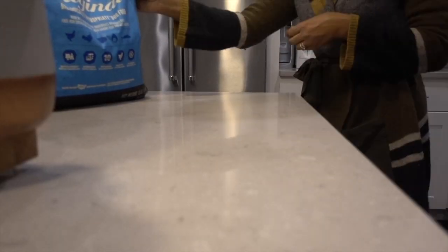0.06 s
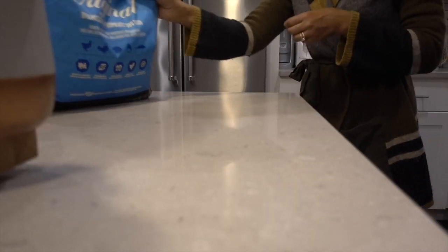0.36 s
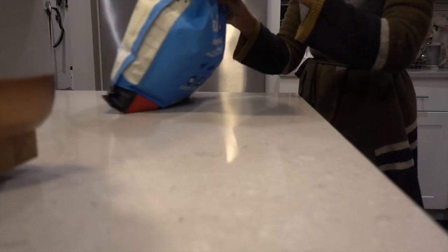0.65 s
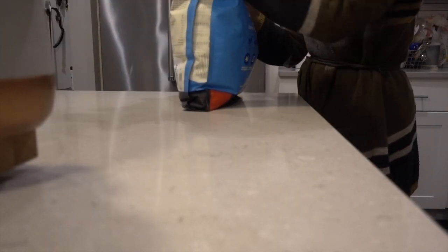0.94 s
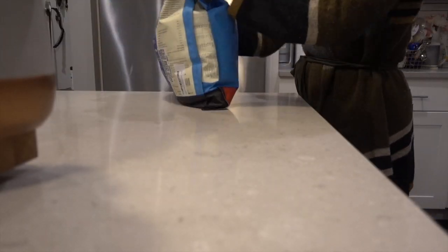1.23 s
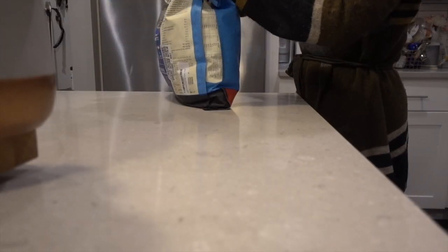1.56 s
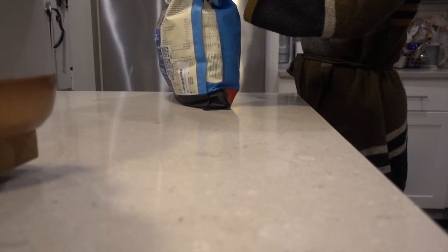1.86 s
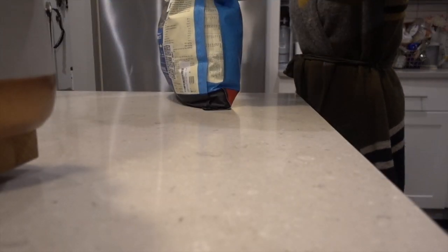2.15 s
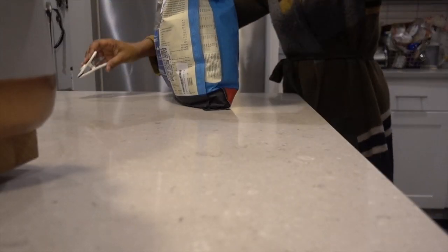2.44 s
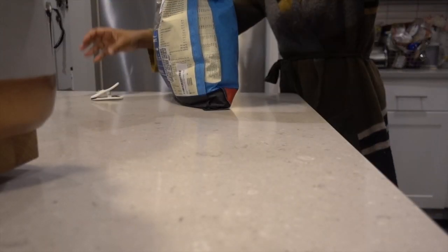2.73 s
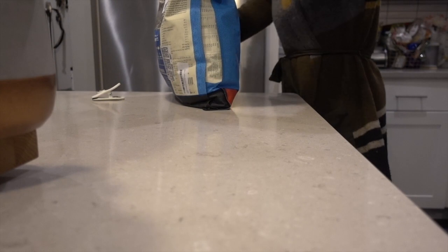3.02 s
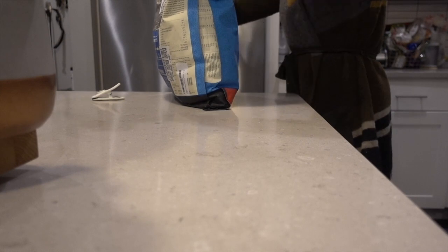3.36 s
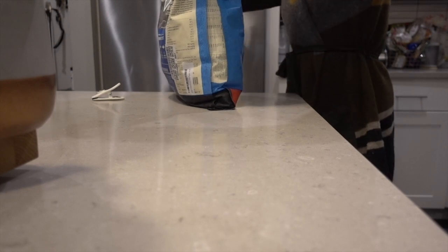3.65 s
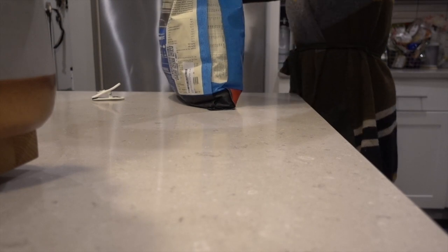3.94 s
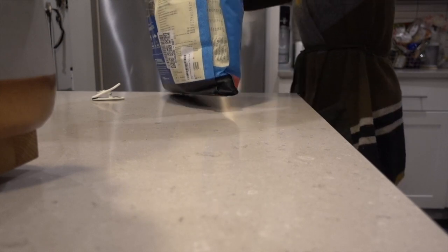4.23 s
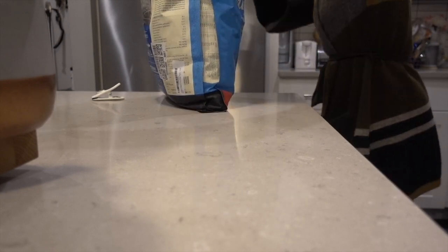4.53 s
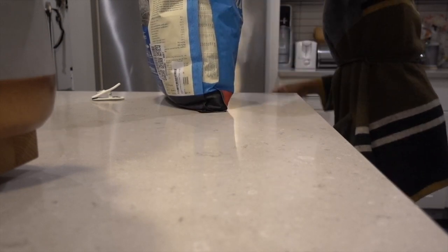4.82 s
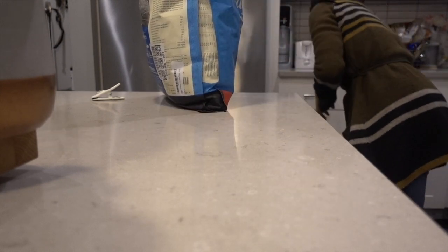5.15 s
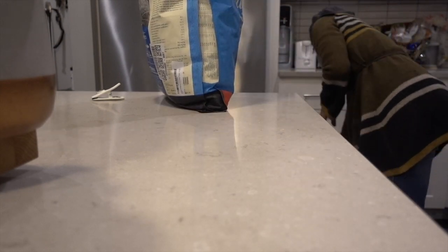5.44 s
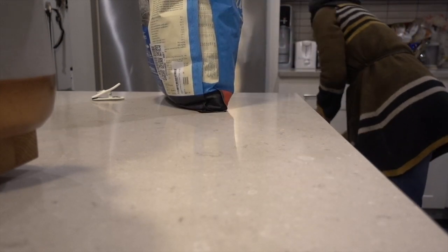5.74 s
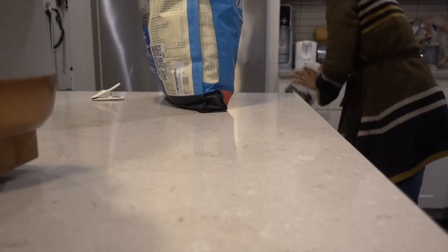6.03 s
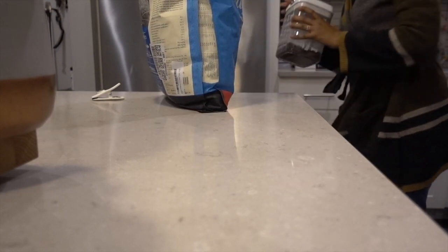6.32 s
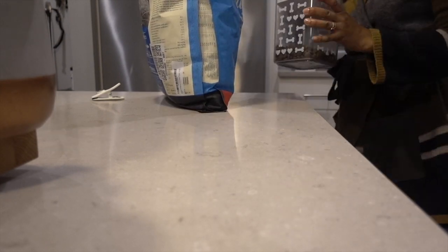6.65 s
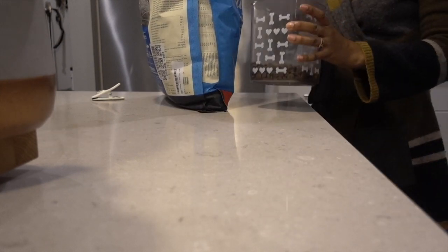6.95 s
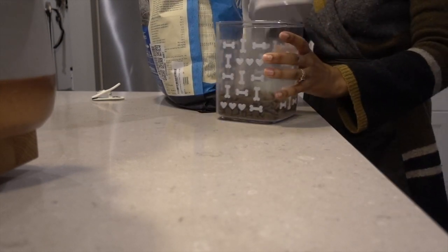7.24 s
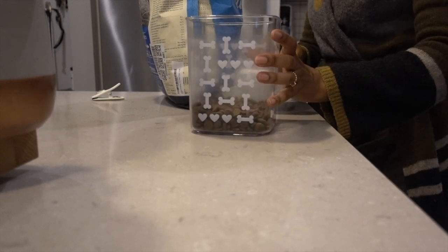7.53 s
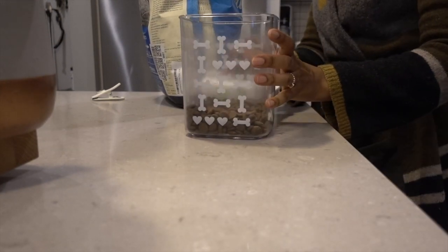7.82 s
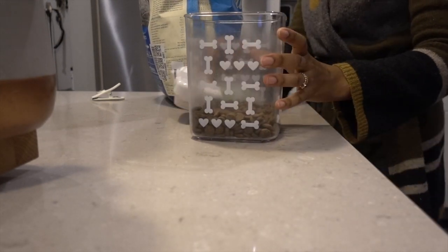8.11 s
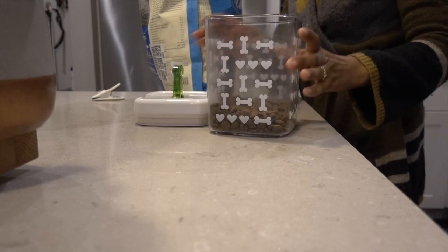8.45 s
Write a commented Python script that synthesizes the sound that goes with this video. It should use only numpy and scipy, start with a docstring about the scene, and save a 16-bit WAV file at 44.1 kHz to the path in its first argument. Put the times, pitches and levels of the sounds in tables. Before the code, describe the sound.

Stiff bag crackling with shifting dry pet food, a small clip dropping, a cupboard knock, then a plastic canister and lid set on stone.

```python
"""Dog food bag and canister

A big plastic bag of dry dog food is dragged over a stone kitchen counter and pulled open: its skin
hisses, creases snap, kibble slumps, and its clip drops and bounces. The bag is hitched up and set down.
A cupboard knocks, and a plastic canister is fetched with some kibble rattling in it. It bumps down on
the counter with a hollow ring, and its lid is laid beside it with a snap and a short rasp."""
import sys
import numpy as np
from scipy import signal
from scipy.fft import rfft, irfft, next_fast_len
from scipy.io import wavfile

SR = 44100
rng = np.random.default_rng(int(sys.argv[2]) if len(sys.argv) > 2 else 0)


def unload_wav(signal):
    """Save mono or channel-first audio to the path in sys.argv[1] as 16-bit WAV at rate SR, clipped to [-1, 1]."""
    wavfile.write(
        sys.argv[1],
        SR,
        np.round(np.clip(np.atleast_2d(signal).T, -1, 1) * 32767).astype(np.int16),
    )


N = 378378
TIME = np.arange(N) / SR


def from_db(db):
    """Decibels to gain."""
    return 10 ** (np.asarray(db) / 20)


def rms_one(x):
    """Scale to unit power."""
    return x / np.sqrt(np.mean(x ** 2) + 1e-20)


def at_hz(points, hz):
    """Read a table on a log-frequency axis."""
    f, value = np.transpose(points)
    return np.interp(np.log(np.maximum(hz, 1)), np.log(f), value)


def add(track, s, sound):
    """Mix a short sound into a track at time s."""
    start = int(np.clip(round(s * SR), 0, N - 1))
    track[start:start + len(sound)] += sound[:N - start]


def colour(x, spectrum, size=4096):
    """Minimum-phase EQ with the given curve; white input keeps its power."""
    cepstrum = irfft(np.log(from_db(at_hz(spectrum, np.fft.rfftfreq(size, 1 / SR)))))
    cepstrum[1:size // 2] *= 2
    cepstrum[size // 2 + 1:] = 0
    response = irfft(np.exp(rfft(cepstrum)))
    return signal.oaconvolve(x, response / np.linalg.norm(response))[:N]


def low_cut(x, hz):
    """A small light panel radiates no bass."""
    return signal.sosfilt(signal.butter(3, hz, "high", fs=SR, output="sos"), x + 1e-18)


def fade(t, t60):
    """Amplitude of a free decay."""
    return np.exp(-np.log(1000) * t / t60)


def ring(hz, t60):
    """A struck mode: a decaying sine."""
    t = TIME[:int(1.5 * t60 * SR) + 2]
    return np.sin(2 * np.pi * hz * t) * fade(t, t60)


def contacts(rows, t60):
    """Each contact is a fast-dying crack of noise."""
    out, t = np.zeros(N), TIME[:SR // 10]
    shape = fade(t, t60)
    for (s, db), noise in zip(rows, rng.standard_normal((len(rows), len(t)))):
        add(out, s, from_db(db) * rms_one(noise * shape) * np.sqrt(np.mean(shape ** 2)))
    return out


def grains(per_s, spread_db):
    """Random tiny impacts at unit power; spread_db sets how uneven they are."""
    sizes = from_db(spread_db * np.minimum(rng.exponential(1, N), 4)) * rng.choice([-1, 1], N)
    return rms_one(sizes * (rng.random(N) < per_s / SR))


def strokes(rows, attack_s, release_t60):
    """Envelope of movements that build up, hold and die away."""
    power = np.zeros(N)
    for s, db, length in rows:
        t = TIME[:int((length + release_t60) * SR)]
        release = fade(np.maximum(t - length, 0), release_t60)
        add(power, s, (from_db(db) * np.minimum(t / attack_s, 1) * release) ** 2)
    return np.sqrt(power)


def swells(rows):
    """Envelope of slides that speed up and slow down; friction grows about as the root of speed."""
    power = np.zeros(N)
    for s, db, length in rows:
        speed = np.abs(np.sin(np.pi * TIME[:int(length * SR)] / length))
        add(power, s, (from_db(db) * speed ** 0.52) ** 2)
    return np.sqrt(power)


def surges(rows, rise_s):
    """Envelope of avalanches that start at once, hold, then run out."""
    power, t = np.zeros(N), TIME[:SR // 2]
    for s, db, length in rows:
        add(power, s, (from_db(db) * (1 - np.exp(-t / rise_s)) * np.exp(-(t / length) ** 2)) ** 2)
    return np.sqrt(power)


def jerks(depth_db, per_s):
    """A gain that wanders at random: stiff plastic yields in fits and starts."""
    draws = rng.standard_normal(2000)
    return from_db(depth_db * np.interp(TIME * per_s, np.arange(len(draws)), draws))


# stereo width of the room: f/Hz, side minus mid/dB
ROOM_WIDTH = [(120, -44), (250, -29), (500, -19.5), (1000, -10.5), (2000, -9.5), (4200, 1.5), (8000, 0),
              (14000, -1.5)]
def diffuse(mid, side):
    """Sound from all around: near mono in the bass, wide in the treble."""
    size = next_fast_len(len(side))
    width = from_db(at_hz(ROOM_WIDTH, np.fft.rfftfreq(size, 1 / SR)))
    side = irfft(rfft(side, size) * width, size)[:len(mid)]
    return np.array([mid + side, mid - side])


# midrange rush of the kitchen: f/Hz, level/dB
ROOM_TONE_EQ = [(29, -102), (50, -59), (167, -28), (246, -11.5), (418, -13), (520, -1.5), (661, -3),
                (802, -2), (863, -7), (950, -5.5), (1540, -11), (1820, -14.5), (2380, -11), (3670, -22.5),
                (16000, -37)]
def room_tone():
    """A soft, steady bed of noise; its level dips once, briefly."""
    mid, side = [colour(noise, ROOM_TONE_EQ) for noise in rng.standard_normal((2, N))]
    dip = np.exp(-((TIME - 1.2) / 0.7) ** 2)
    return from_db(-44 - 13 * dip) * diffuse(mid, side)


# hands squeezing, hands and sleeves rubbing, kibble slumping: t/s, level/dB, length/s
BAG_SQUEEZES = [(0.02, -36, 0.13), (0.18, -26, 0.2), (0.45, -34, 0.88), (1.14, -23.5, 0.1),
                (1.34, -39, 0.078), (1.79, -37, 0.29), (2.07, -31, 0.23), (2.39, -30.5, 0.078),
                (2.63, -40, .06), (2.97, -35.5, 0.076), (3.29, -29, 0.15), (3.43, -22, 0.093),
                (3.8, -36, .3), (4.2, -22.5, 0.13)]
BAG_RUBS = [(0.0, -39, 0.13), (1.07, -38.5, .4), (1.61, -44.5, .15), (1.76, -45, 0.3), (2.27, -39.5, .2),
            (2.62, -41, 0.28), (3.06, -40, .07), (3.26, -35.5, 0.14), (3.49, -38, 0.11), (3.77, -46, 0.1),
            (3.99, -43, .16), (4.17, -37.5, 0.12), (4.36, -41, 0.14), (4.59, -46, .13)]
KIBBLE_SLUMPS = [(.19, -27, 0.087), (1.163, -22, 0.11), (1.35, -28, 0.098), (2.143, -22.5, 0.025),
                 (2.185, -20, 0.07), (2.312, -31, 0.04), (3.325, -32.5, 0.11), (3.432, -26.5, 0.048),
                 (3.966, -20, 0.051), (4.005, -18, 0.12), (4.246, -16, 0.04), (4.372, -19, 0.011),
                 (4.379, -19, 0.027), (4.43, -23, 0.026)]
# fader curve of the drag, gathering speed and slowing: t/s, level/dB
BAG_DRAG = [(0.2, -51), (0.45, -27), (0.89, -30.5), (1.06, -43.5)]
# the bag's bottom bumping the counter: t/s, level/dB
BAG_BUMPS = [(.244, -13.5), (.3, -14.5), (.582, -18), (.698, -16), (.741, -16.5), (.8, -29), (.988, -25),
             (4.251, -11), (4.383, -11.5)]
# the bag's body, sliding hiss, bright plastic tick and dull bump: f/Hz, level/dB
BAG_EQ = [(29, -87), (50, -66), (91, -31), (122, -16), (252, -3), (371, -1), (783, 1), (973, 0.5),
          (1300, 4), (1500, 2), (2560, 1.5), (3180, -2.5), (5270, -10.5), (10100, -40.5), (16000, -29)]
SLIDE_EQ = [(40, -55), (150, -28), (330, 0), (650, -6.5), (1200, -2.5), (3000, 0.5), (4800, -8.5),
            (7000, -0.5), (10000, 1.5), (13500, -6), (16000, -8)]
TICK_EQ = [(3000, -19.5), (5000, -1.5), (7500, 2), (10500, 0.5), (13000, -6), (16000, -16)]
BUMP_EQ = [(40, -48), (110, -30), (250, -4), (400, 0), (700, 7.5), (1300, -3), (3000, -8.5), (8000, -64)]
def bag_rustle():
    """Small folds crackle, kibble slumps against the walls, the skin hisses and the bottom bumps."""
    crumple = strokes(BAG_SQUEEZES, attack_s=0.0082, release_t60=0.18) * jerks(depth_db=2, per_s=28)
    fine_folds = from_db(-8) * grains(per_s=1200, spread_db=4)
    single_folds = from_db(-11) * grains(per_s=65, spread_db=4)
    crackle = crumple * (fine_folds + single_folds)
    load = surges(KIBBLE_SLUMPS, rise_s=0.0025)
    slump = from_db(-2.5) * load * grains(per_s=1300, spread_db=3.5)
    crinkle = from_db(-17) * load * grains(per_s=200, spread_db=1.5)   # the load flicks tiny sharp folds
    drag_s, drag_db = np.transpose(BAG_DRAG)
    gate = (TIME > drag_s[0] - 0.05) & (TIME < drag_s[-1] + 0.05)
    drag = from_db(np.interp(TIME, drag_s, drag_db)) * gate
    hiss = np.hypot(drag, swells(BAG_RUBS)) * grains(per_s=11000, spread_db=4.5)
    bumps = colour(contacts(BAG_BUMPS, t60=0.027), BUMP_EQ)
    return colour(crackle + slump, BAG_EQ) + colour(crinkle, TICK_EQ) + colour(hiss, SLIDE_EQ) + bumps


# broad crack of a plastic panel: f/Hz, level/dB
CRACK_EQ = [(60, -62), (150, -19.5), (300, -5.5), (700, 1), (1200, -1), (3000, 4.5), (4200, -2.5),
            (5500, -26.5), (16000, -37)]
def snaps(rows, ring_db, body_db, tick_db, ring_t60):
    """A plastic panel snaps: a brief ring at its own pitch, a broad crack and a bright tick."""
    panel = np.zeros(N)
    for s, db, hz, bright in rows:
        add(panel, s, from_db(db) * ring(hz, ring_t60))
    body = colour(contacts([(s, db) for s, db, hz, bright in rows], t60=0.022), CRACK_EQ)
    tick = colour(contacts([(s, bright) for s, db, hz, bright in rows], t60=0.012), TICK_EQ)
    return from_db(ring_db) * low_cut(panel, hz=444) + from_db(body_db) * body + from_db(tick_db) * tick


# the loudest creases: t/s, level/dB, f/Hz, tick level/dB
BAG_CREASES = [(0.187, -13, 1960, -19.5), (0.24, -10, 1400, -28), (0.28, -16.5, 1280, -33),
               (0.364, -19, 1960, -30), (0.533, -17.5, 2500, -28), (0.652, -16, 2380, -24),
               (0.797, -23, 1080, -26), (1.114, -14.5, 1010, -35), (1.166, -15.5, 1230, -16.5),
               (1.19, -13, 3240, -32), (1.203, -12, 1130, -20.5), (1.212, -12.5, 1290, -22),
               (1.356, -14.5, 1390, -31), (1.8, -27, 1240, -40), (1.91, -32, 3180, -31.5),
               (2.075, -17, 3030, -32), (2.102, -13, 2960, -21.5), (2.142, -11.5, 1510, -27),
               (2.178, -7, 3080, -15.5), (2.245, -11.5, 2700, -42), (2.262, -10.5, 1150, -25.5),
               (2.311, -7.5, 3090, -19.5), (2.397, -14.5, 2470, -20), (2.975, -21, 1170, -33.5),
               (3.042, -22, 1050, -55), (3.279, -20.5, 1230, -37), (3.33, -13, 2740, -25),
               (3.435, -9.5, 2430, -18.5), (3.448, -14.5, 1290, -34), (3.873, -15, 1060, -46),
               (3.906, -14.5, 2670, -26.5), (3.966, -7.5, 1310, -18), (3.988, -8, 2500, -17.5),
               (4.034, -7.5, 2500, -24), (4.091, -7.5, 2490, -25), (4.212, -11.5, 2670, -38),
               (4.246, -9.5, 2730, -22), (4.38, -9, 1210, -19.5)]
def bag_creases(mean_lag_s=0.011, after_db=-8):
    """Each crease snaps over and sets off a weaker neighbour, just after and at a nearby pitch."""
    luck = rng.uniform(-1, 1, (len(BAG_CREASES), 2))
    neighbours = [(s + mean_lag_s * (1 + late / 2), db + after_db, hz * 2 ** (shift / 2), tick + after_db)
                  for (s, db, hz, tick), (late, shift) in zip(BAG_CREASES, luck)]
    return snaps(list(BAG_CREASES) + neighbours, ring_db=0, body_db=-5.5, tick_db=3, ring_t60=0.01)


# stutters during the drag: t/s, level/dB, length/s
BAG_JUDDERS = [(0.58, -35, 0.042), (0.69, -34.5, 0.09)]
def bag_judder():
    """The heavy bottom moves over the stone in quick, dull slips."""
    slipping = strokes(BAG_JUDDERS, attack_s=0.012, release_t60=0.1)
    return colour(slipping * grains(per_s=260, spread_db=1.5), BUMP_EQ)


# whole walls buckling: t/s, level/dB, f/Hz, t60/s
WALL_POPS = [(2.3973, -4.5, 2400, 0.0062), (3.419, -15, 2100, 0.043), (3.6802, -8, 2120, 0.0047),
             (4.059, -6, 2900, .011)]
def bag_pops():
    """A stiff wall of the bag buckles with a short, pitched pop."""
    out = np.zeros(N)
    for s, db, hz, t60 in WALL_POPS:
        add(out, s, from_db(db) * ring(hz, t60))
    return low_cut(out, hz=596)


# bounces on the counter: t/s, knock level/dB, tick level/dB
CLIP_BOUNCES = [(2.637, -16.5, -27), (2.699, -21.5, -18.5), (2.741, -30, -22.5), (2.7767, -22, -21),
                (2.779, -24, -17), (2.785, -24.5, -24), (2.817, -23, -32)]
# resonances of the bag clip: f/Hz, level/dB, t60/s
BAG_CLIP_MODES = [(416, -11, 0.064), (595, -7, 0.047), (797, -5, 0.039), (1044, -6.5, 0.059),
                  (2670, 10, 0.0022), (4040, -0.5, 0.0087)]
def bag_clip():
    """The light clip bounces and settles: a hollow knock and a bright tick at each touch."""
    knock = np.zeros(N)
    scatter_db = 0.62 * rng.standard_normal((len(CLIP_BOUNCES), len(BAG_CLIP_MODES)))
    for (s, db, bright), scatter in zip(CLIP_BOUNCES, scatter_db):
        for k, (hz, mode_db, t60) in enumerate(BAG_CLIP_MODES):
            add(knock, s, (-1) ** k * from_db(db + mode_db + scatter[k]) * ring(hz, t60))
    tick = colour(contacts([(s, bright) for s, db, bright in CLIP_BOUNCES], t60=0.0078), TICK_EQ)
    return from_db(-4) * low_cut(knock, hz=250) + from_db(3) * tick


# pushes along the shelf: t/s, level/dB, length/s
SHELF_SCRAPES = [(5.468, -35, 0.015), (5.845, -41, 0.024), (5.988, -27.5, 0.025)]
# the cupboard door's knock: t/s, level/dB
DOOR_KNOCK = [(5.678, -12.5)]
# gritty shelf and woody door: f/Hz, level/dB
SHELF_EQ = [(150, -59), (500, -5), (950, 3.5), (2200, 0.5), (3500, -13.5), (8000, -25), (16000, -44)]
DOOR_EQ = [(50, -48), (130, -39), (200, -2.5), (255, 0.5), (360, -5), (590, -8), (710, 9), (790, -4),
           (1350, -3.5), (2600, -8.5), (4400, -16.5), (8000, -23.5), (16000, -24)]
def cupboard():
    """A dull wooden knock across the room, and the canister scraping off its shelf."""
    knock = from_db(-3.5) * colour(contacts(DOOR_KNOCK, t60=0.052), DOOR_EQ)
    scrape = surges(SHELF_SCRAPES, rise_s=0.0023) * grains(per_s=680, spread_db=-0.5)
    return knock + colour(scrape, SHELF_EQ)


# base and lid scuffing, pellets rolling, pellets hitting the walls: t/s, level/dB, length/s
CANISTER_SCUFFS = [(5.53, -49.5, 0.085), (6.685, -32, 0.044), (7.24, -34.5, 0.2), (7.35, -38, .23),
                   (7.48, -50.5, 0.31), (8.04, -40, 0.29)]
KIBBLE_ROLLS = [(5.54, -36.5, 0.025), (5.84, -44, 0.062), (6.06, -41.5, 0.15), (6.27, -47, 0.07),
                (7.28, -43, 0.12), (7.58, -44.5, 0.069), (8.07, -37.5, 0.31)]
KIBBLE_RATTLES = [(5.94, -31, 0.013), (6.693, -13, 0.0072), (6.7, -14.5, 0.06), (6.72, -22.5, 0.088),
                  (7.167, -22.5, 0.038), (7.776, -29, 0.022), (7.85, -22.5, 0.082), (8.044, -20, 0.032),
                  (8.135, -23, 0.022), (8.228, -25, 0.012)]
# pellets in a plastic box: f/Hz, level/dB
KIBBLE_EQ = [(40, -55), (90, -47), (145, -25), (230, -15.5), (363, -10.5), (607, 1), (715, -2.5),
             (1250, -1), (2500, -3.5), (4000, -12.5), (5600, -19), (9500, -23), (16000, -29)]
def kibble_in_canister():
    """Pellets roll as the canister tilts and rattle at each jolt; its base and lid scuff."""
    roll = strokes(KIBBLE_ROLLS, attack_s=0.013, release_t60=0.22)
    rattle = surges(KIBBLE_RATTLES, rise_s=0.0011)
    pellets = from_db(-2.5) * (roll + rattle) * grains(per_s=1700, spread_db=4.5)
    scuff = from_db(-1.5) * swells(CANISTER_SCUFFS) * grains(per_s=9000, spread_db=2.5)
    return colour(pellets, KIBBLE_EQ) + colour(scuff, SLIDE_EQ)


# light, hard touches: t/s, level/dB, f/Hz, tick level/dB
PLASTIC_TICKS = [(5.87, -32, 2400, -53), (5.941, -30, 3210, -60), (6.082, -25.5, 2530, -44),
                 (6.287, -31.5, 2330, -49), (7.699, -30, 1430, -57), (8.0345, -14.5, 1860, -32),
                 (8.144, -21, 1550, -31), (8.545, -32, 1410, -51)]
def plastic_ticks():
    """Hard plastic ticks against plastic and stone."""
    return snaps(PLASTIC_TICKS, ring_db=2, body_db=-6, tick_db=2, ring_t60=0.014)


# landings on the counter: t/s, level/dB, lowest mode trim/dB, tuning/ratio, ring length/ratio
CANISTER_HITS = [(7.1666, -14, 6, 1.02, 0.45), (7.3753, -15, -9.5, 0.96, 1.1),
                 (7.8493, -13.5, 0, 1.02, 1.46), (8.0443, -14, -1, 1.02, 0.62)]
# resonances of the hollow box: f/Hz, level/dB, t60/s
CANISTER_MODES = [(413.6, -3.5, 0.24), (625.6, 3, 0.12), (557, -9, 0.077), (860, -13.5, 0.1),
                  (1180, -7, 0.048), (1360, -5.5, 0.041), (1790, -5.5, 0.022), (2130, -11, 0.045),
                  (2400, -14, 0.034), (2770, -14, 0.041), (2990, -10.5, 0.034), (7620, -15, 0.036)]
# boxy chatter of the base as it lands: f/Hz, level/dB
CLUNK_EQ = [(50, -43), (150, -30), (300, -11), (420, 5), (630, 0), (800, 1), (2000, -13), (3200, -8.5),
            (5000, -26), (16000, -51)]
def canister_knocks():
    """An edge hits the stone and the hollow box rings; the grip shifts its pitch and damping."""
    box = np.zeros(N)
    scatter_db = 2.5 * rng.standard_normal((len(CANISTER_HITS), len(CANISTER_MODES)))
    for (s, db, low_db, tuning, length), scatter in zip(CANISTER_HITS, scatter_db):
        scatter[:2] = low_db, 0   # the two main modes are not left to chance
        for k, (hz, mode_db, t60) in enumerate(CANISTER_MODES):
            add(box, s, (-1) ** k * from_db(db + mode_db + scatter[k]) * ring(hz * tuning, t60 * length))
    blows = [(s, db) for s, db, *rest in CANISTER_HITS]
    clunk = from_db(-3.5) * colour(contacts(blows, t60=0.095), CLUNK_EQ)
    crack = from_db(-5) * colour(contacts(blows, t60=0.014), TICK_EQ)
    return low_cut(box, hz=217) + clunk + crack


# the lid's clacks, its thump and the snap of its catch: t/s, level/dB
LID_CLACKS = [(8.271, -8), (8.277, -20), (8.293, -16), (8.31, -12.5)]
COUNTER_THUMP = [(8.311, -16)]
CATCH_SNAP = [(8.3145, -12)]
# hollow clack and low thump: f/Hz, level/dB
CLACK_EQ = [(88, -68), (150, -63), (315, -18), (484, -13.5), (649, -0.5), (1020, -8.5), (1690, 1),
            (2810, -12), (3420, -2), (4160, -14), (4490, -22), (7620, -22), (16000, -45)]
THUMP_EQ = [(30, -11), (150, -7), (600, 8), (2000, -27), (8000, -50)]
def lid():
    """The lid clacks down, thumps the counter and its catch snaps."""
    clack = from_db(-4.5) * colour(contacts(LID_CLACKS, t60=0.04), CLACK_EQ)
    thump = colour(contacts(COUNTER_THUMP, t60=0.005), THUMP_EQ)
    snap = colour(contacts(CATCH_SNAP, t60=0.01), TICK_EQ)
    return clack + thump + snap


# the lid rubbing: t/s, level/dB, length/s
LID_RUBS = [(8.315, -17.5, 0.025), (8.332, -20, 0.062)]
# bright rasp over a hollow midrange peak: f/Hz, level/dB
RASP_EQ = [(71, -73), (120, -51), (295, -18), (557, -14), (630, 4.5), (698, 0), (1070, -8.5), (1680, -7),
           (1830, -6.5), (2430, -11), (4500, -5.5), (7500, -12), (11100, -12), (16000, -27)]
def lid_rasp():
    """A short bright rasp of rubbing plastic follows the snap."""
    return colour(surges(LID_RUBS, rise_s=0.0035) * grains(per_s=9900, spread_db=5), RASP_EQ)


# reverb time of the kitchen: f/Hz, t60/s
ROOM_DECAY = [(200, 0.56), (550, 0.51), (1400, 0.56), (3700, 0.48), (10000, 0.32), (16000, 0.37)]
def kitchen_echo(gap_s=0.0029, build_s=0.0033, early_db=2, early_t60=0.049, bands=12):
    """Stereo response: a strong wash from the near cupboards, then a tail dying band by band."""
    t = TIME[:2 * (SR // 3)]
    hz = np.fft.rfftfreq(len(t), 1 / SR)
    edges = np.r_[0, np.geomspace(150, SR / 2, bands)]
    walls = rfft(rng.standard_normal((2, len(t))) * (1 + from_db(early_db) * fade(t, early_t60)))
    tail = sum(irfft(walls * (hz >= lo) * (hz < hi)) * fade(t, at_hz(ROOM_DECAY, (lo + hi) / 2))
               for lo, hi in zip(edges, edges[1:]))
    mid, side = tail * np.clip((t - gap_s) / build_s, 0, 1)
    return diffuse(mid, side) / np.linalg.norm(mid)


def kitchen(x, moves_per_s=45, spots=9):
    """Sounds come from ever-changing spots on bag and counter, and each spot has its own echo."""
    times = np.arange(0, N / SR + 1, 1 / moves_per_s)
    draws = rng.standard_normal((spots, 1000))[:, :len(times)]
    shares = np.array([np.interp(TIME, times, row) for row in draws])
    shares /= np.linalg.norm(shares, axis=0)   # equal-power crossfade
    return sum(signal.oaconvolve((x * share)[None], kitchen_echo(), axes=1)[:, :N] for share in shares)


def scene():
    """Dry sources and their kitchen reverb over room tone, leaning slightly left."""
    creases, ticks = bag_creases(), plastic_ticks()
    # sound, direct level/dB, reverb send/dB
    sources = [(bag_rustle() + bag_judder(), -2.5, -3), (creases, 0, -2.5), (bag_pops(), 0, -6),
               (bag_clip(), 0, -1), (cupboard(), -3, -1), (kibble_in_canister(), -1.5, -1.5),
               (ticks, 0, -1.5), (canister_knocks(), -1, -8), (lid(), 0, -4), (lid_rasp(), -1.5, -3)]
    direct = sum(from_db(direct_db) * sound for sound, direct_db, send_db in sources)
    send = sum(from_db(send_db) * sound for sound, direct_db, send_db in sources)
    return (direct + kitchen(send) + room_tone()) * from_db([[0.25], [-0.25]])


def record(dry):
    """Soft saturation rounds the loudest peaks; a steep low-pass cuts the top at 16 kHz."""
    rounded = 0.96 * np.tanh(dry / 0.86)
    return signal.sosfilt(signal.ellip(10, 0.1, 80, 16000, fs=SR, output="sos"), rounded)


dry = scene()
out = record(dry)
unload_wav(out)
```